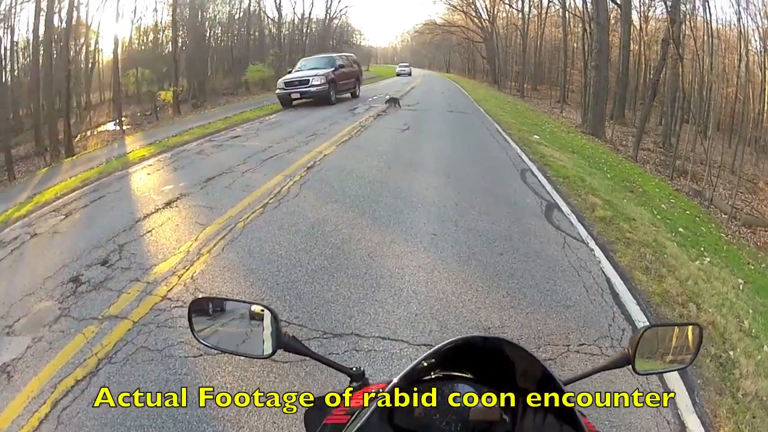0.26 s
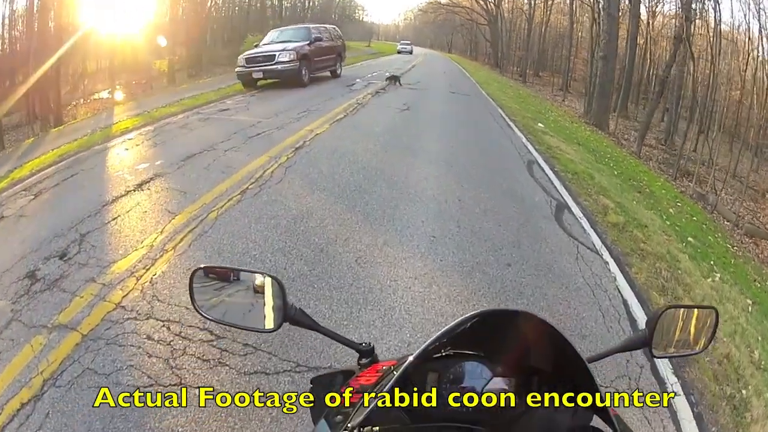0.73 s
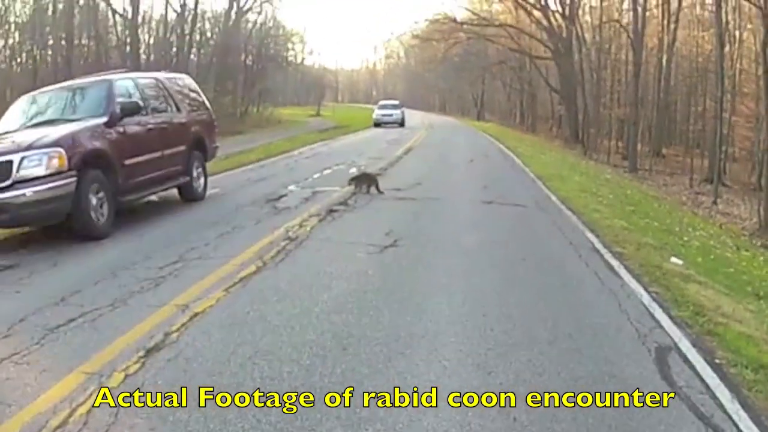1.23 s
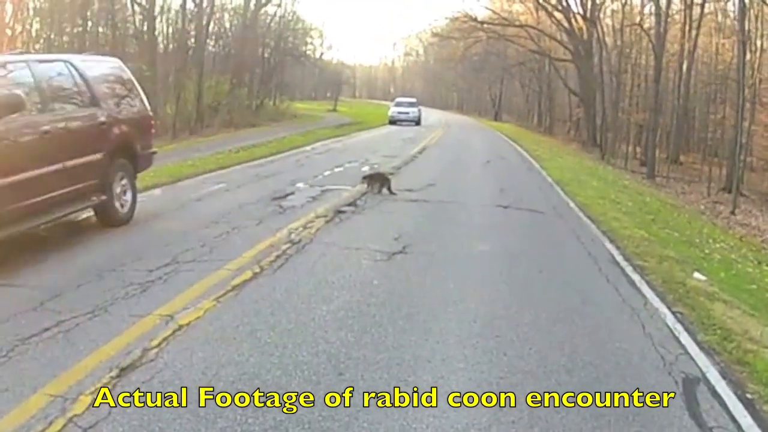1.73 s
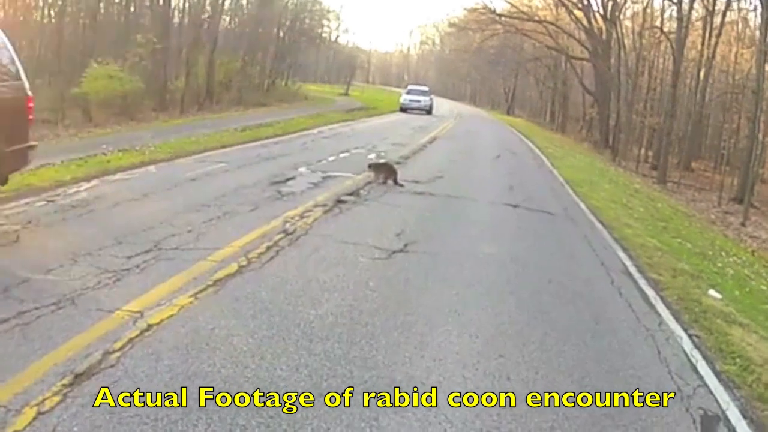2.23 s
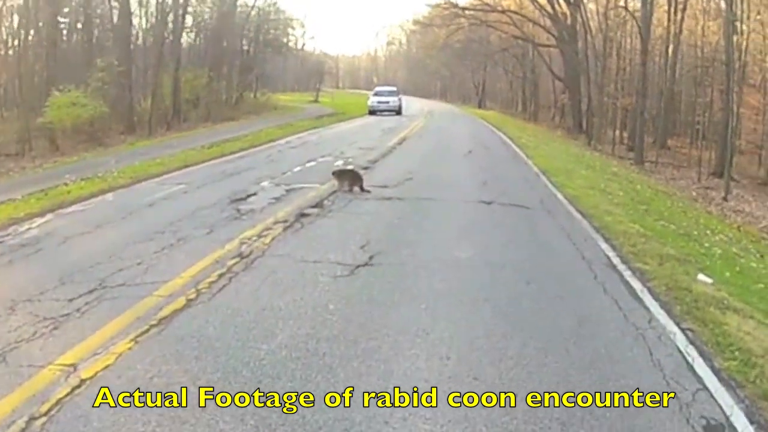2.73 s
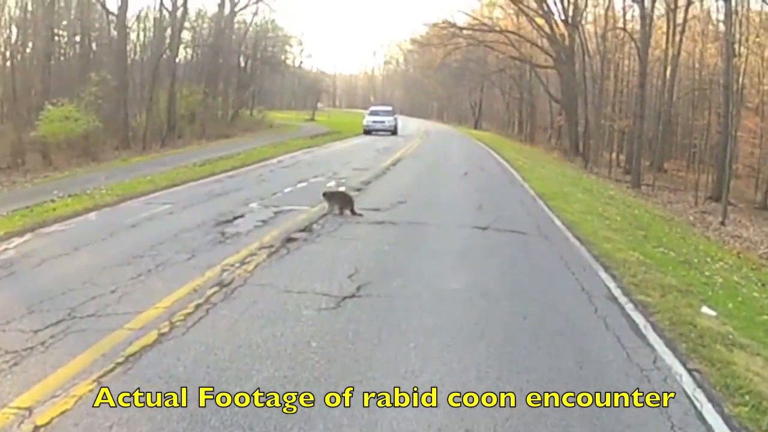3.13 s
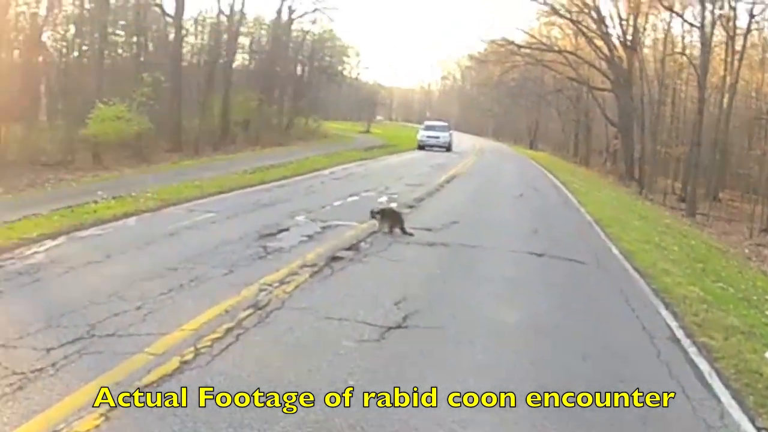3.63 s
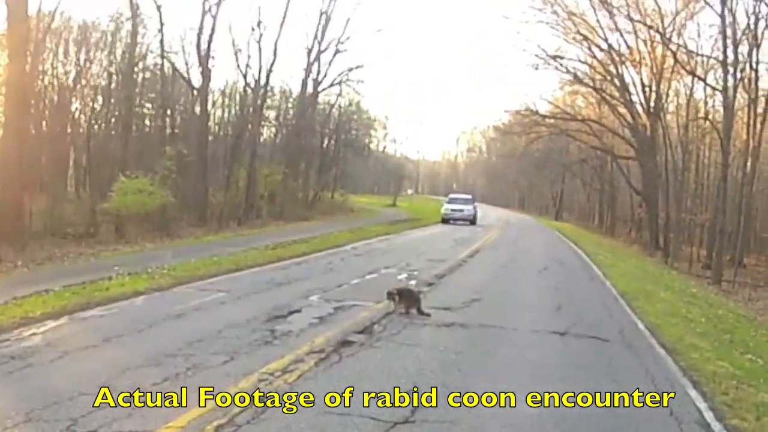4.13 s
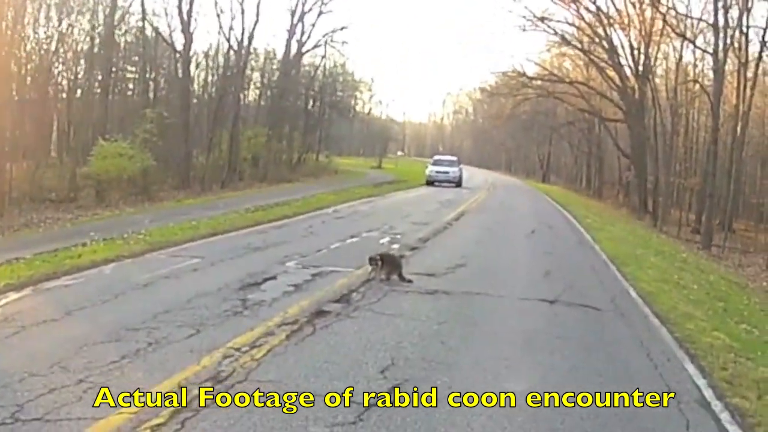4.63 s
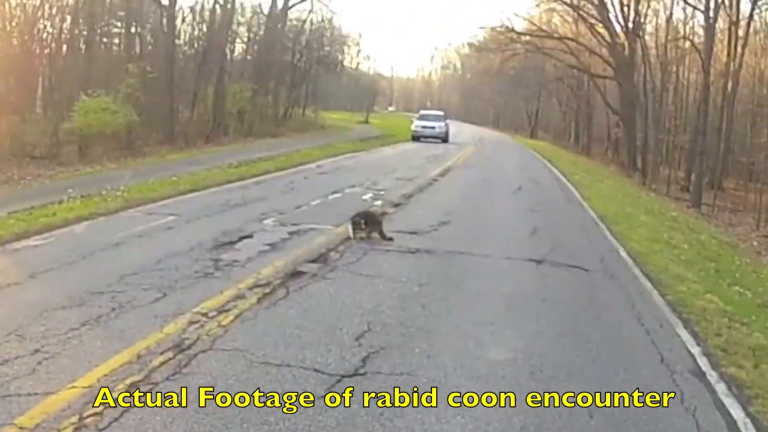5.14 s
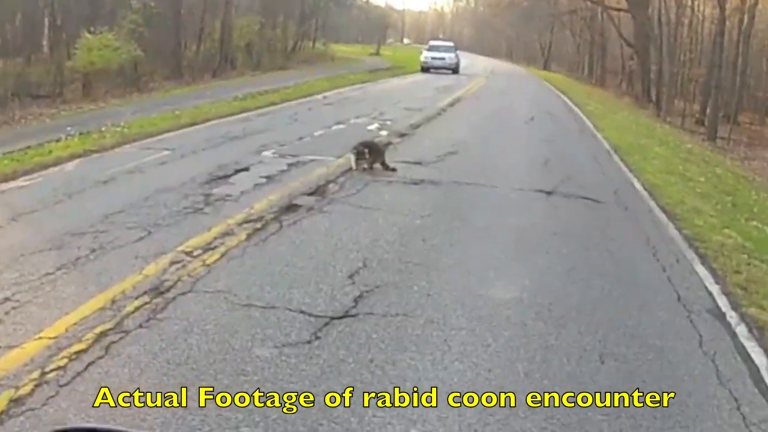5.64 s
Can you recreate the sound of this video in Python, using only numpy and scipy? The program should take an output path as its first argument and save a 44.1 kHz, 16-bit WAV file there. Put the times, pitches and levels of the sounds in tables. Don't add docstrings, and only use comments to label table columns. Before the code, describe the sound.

Gritty, overloaded motorcycle exhaust: two throttle bursts, a stumbling fall in revs, quieter lumpy idling, and a final abrupt rev.

```python
import sys
import numpy as np
from scipy import signal
from scipy.fft import rfft, irfft
from scipy.io import wavfile
from scipy.ndimage import uniform_filter1d

SR = 44100
rng = np.random.default_rng(int(sys.argv[2]) if len(sys.argv) > 2 else 0)


def field_ratio(decibels):
    return 10 ** (np.asarray(decibels, dtype=float) / 20)


def wav_record(signal):
    frames = np.transpose(np.atleast_2d(signal))
    bounded = np.clip(frames, -1, 1)
    quanta = np.round(bounded * 32767).astype(np.int16)
    wavfile.write(sys.argv[1], SR, quanta)


N = 258999
TIME = np.arange(N) / SR
CHANGE_S = 5.0193
IDLE_PER_S = 46.766


def evened(x):
    return x / np.sqrt(np.mean(x ** 2) + 1e-20)


def curve(rows, column=1):
    rows = np.asarray(rows, float)
    return np.interp(TIME, rows[:, 0], rows[:, column])


def coloured(x, points):
    points_hz, points_db = np.transpose(points)
    hz = np.fft.rfftfreq(N, 1 / SR)
    gain_db = np.interp(np.log(hz + 1), np.log(points_hz), points_db)
    return evened(irfft(rfft(x) * field_ratio(gain_db), N))


# start in seconds, name of the way of running.
RIDE = [(0, "pull"), (0.1, "ease"), (.17, "coast"), (0.229, "pull"), (0.35, "overrun"), (.58, "starve"),
        (.735, "pop"), (.865, "coast"), (.95, "stumble"), (1.16, "stall"), (1.294, "idle"), (5.38, "pull"),
        (5.458, "top"), (5.584, "cruise"), (5.8, "settle")]


def running(table, column, glide_s=.03):
    now = np.searchsorted([start_s for start_s, _ in RIDE], TIME, "right") - 1
    values = np.array([table[way][column] for _, way in RIDE], float)
    return uniform_filter1d(values[now.clip(0)], size=round(glide_s * SR), mode="nearest")


def revs(rate):
    return np.clip((rate - 60) / 70, 0, 1)


# time in seconds, firings per second.
BLIPS = [
    [(0, 45.79), (.05, 69.35), (.1, 110.37), (.132, 117.98), (.2, 103.18), (.236, 75.64)],
    [(.31, 149.35), (.35, 200.85), (.39, 209.74), (.46, 190.34), (.62, 152.8), (.88, 97.25), (1.0, 81.51),
     (1.2, 55.95), (1.28, 48.0)],
    [(4.95, 49.2), (5.3, 44.6), (5.372, 46.46), (5.4, 65), (5.44, 86.45), (5.57, 164.3), (5.64, 183.5),
     (5.7, 171.7), (5.873, 156.6)],
]
# swings per second, size in firings per second, rising at seconds.
HUNTING = [(.892, .391, 2.416), (2.193, .544, 2.999), (2.78, .338, 3.181)]
# middle in seconds, extra firings per second, half width in seconds.
SURGES = [(2.802, 5.774, .192), (4.701, 6.855, .392)]


def speed_before():
    idle = IDLE_PER_S - .629 * (TIME - 3)
    for swings_per_s, size, rising_s in HUNTING:
        idle += size * np.sin(2 * np.pi * swings_per_s * (TIME - rising_s))
    for middle_s, size, width_s in SURGES:
        idle += size * np.exp(-((TIME - middle_s) / width_s) ** 2)
    blips_end_s = BLIPS[1][-1][0]
    return np.where(TIME < blips_end_s, curve(BLIPS[0] + BLIPS[1]), idle)


def speed_after():
    return curve(BLIPS[2]) * (TIME >= BLIPS[2][0][0])


LEVELS = {"pull": (2.5, -45, -19.5, -43.5), "ease": (-5.5, -30, -18.5, -49),
          "overrun": (-8.5, -3.5, -20.5, -39.5), "starve": (-13, -2.5, -19.5, -35),
          "pop": (0, -4.5, -17.5, -36.5), "coast": (-41, -4.5, -19, -37), "stumble": (-23, -1, -20, -38),
          "stall": (-25, -16, -20, -40), "idle": (2.5, -10, -22.5, -40.5), "top": (1, -39, -21, -44.5),
          "cruise": (-1.5, -56, -28.5, -42), "settle": (-3, -48, -27.5, -51)}
# frequency in Hz, level in dB per Hz.
CASING = [(430, -30), (540, -1.5), (625, 15.5), (720, -3), (1200, -8), (1560, -4), (2060, -3), (2600, -4),
          (2860, -3), (3320, -9.5), (3820, -8.5), (4580, -10.5), (5690, -22), (6200, -41)]
# frequency in Hz, level in dB per Hz.
CASING_REVVED = [(430, -24), (620, 13.5), (800, -0.5), (1150, -13), (1420, -4.5), (1670, -7.5), (2280, -2),
                 (2690, -2.5), (2920, 1.5), (3300, -7.5), (4260, -10), (4580, -9), (5460, -20.5),
                 (6200, -24)]


def valve_rattle(rate):
    unevenness = evened(uniform_filter1d(rng.standard_normal(N), 150))
    ticks = rng.standard_normal(N) * field_ratio(1.36 * unevenness)
    fast = regular_share = revs(rate)
    idle_ring = np.sqrt(1 - regular_share) * coloured(ticks, CASING)
    revved_ring = np.sqrt(fast) * coloured(ticks[::-1], CASING_REVVED)
    level_db = running(LEVELS, column=3, glide_s=.15)
    level_db = level_db + 2 * np.log2(rate / IDLE_PER_S)
    return field_ratio(level_db + 4.5) * (idle_ring + revved_ring)


def gear_whine(rate, turns):
    return field_ratio(-52.5) * revs(rate) ** 2 * np.sin(2 * np.pi * turns * 7)


# frequency in Hz, width in Hz, then levels in dB for
PIPE = [(56, 17.4, -20.5, -39.5, -41.5, -19), (98, 140, -42, -3, 22.5, -13),
        (136.9, 56.6, -5.5, -22, -11, -18), (185.9, 40.7, 0.5, -3.5, -12, -21.5),
        (298.8, 66.6, 2, 0, 1.5, 2), (386, 39, -22, -2.5, -15.5, -13), (530.7, 44, -26, -3, -38.5, -19),
        (598, 62, -36.5, -39, -13.5, 0.5), (860, 280, -36, -44, -34, -31.5)]
LEAD = 220


def pipe(column, puff_ms, dip, dip_ms):
    t = np.arange(6000) / SR
    ring = np.zeros(len(t))
    for row in PIPE:
        hz, width_hz = row[:2]
        ring += field_ratio(row[column]) * np.exp(-np.pi * width_hz * t) * np.cos(2 * np.pi * hz * t)
    ms = 1000 * t[:500] - 5
    puff = np.exp(-(ms / puff_ms) ** 2) - dip * np.exp(-((ms + dip_ms) / puff_ms) ** 2)
    answer = np.convolve(ring, puff)
    answer = np.roll(answer, LEAD - np.argmax(answer))
    return answer / answer.max()


def gas_roar(turns):
    gust = 1.8 + np.exp(-(turns % 1))
    hiss = gust * rng.standard_normal(N)
    roar = signal.oaconvolve(hiss, pipe(column=5, puff_ms=0.58, dip=0.19, dip_ms=1.33))
    return field_ratio(running(LEVELS, column=2)) * evened(roar[:N])


# level in dB, lateness as a share of a firing.
CYLINDERS = [(0, 0), (-.8, .018), (.2, .003), (-.6, .015)]
ROUGHNESS = {"pull": (.12, .8), "ease": (.18, 1), "overrun": (.12, 1.7), "starve": (.11, 1.8),
             "pop": (.13, 1.3), "coast": (.22, 1), "stumble": (.4, 1), "stall": (.3, 1), "idle": (.09, .9),
             "top": (.07, .5), "cruise": (.06, .45), "settle": (.05, .4)}
# time in seconds, puff level in dB against overload.
CATCHES = [(.233, 1.5), (.263, 3), (0.88, 2.5), (.900, 0.5), (0.909, -8), (1.054, 5), (1.067, 5),
           (1.141, 4), (1.157, -2.5), (1.174, 3), (1.19, -1.5), (1.227, 1), (1.268, -5), (1.286, 2.5),
           (5.405, -4), (5.431, -5.5)]
# time in seconds, level in dB against overload.
GULPS = [(0.025, 4), (0.263, 9.5), (.280, 0), (0.955, 2), (1.004, -16), (1.029, -13), (1.111, -9),
         (1.127, -9)]


def exhaust_pulses(rate, turns):
    count = np.arange(1, int(turns[-1]) + 1)
    chance = rng.standard_normal((len(count), 3))
    due = np.searchsorted(turns, count)
    uneven = running(ROUGHNESS, column=0)[due]
    imbalance = running(ROUGHNESS, column=1)[due]
    step_db, late = np.transpose(CYLINDERS)[:, count % 4] * imbalance
    fast = revs(rate)

    at = np.searchsorted(turns, count + late + .045 * uneven * chance[:, 0]).clip(0, N - 1)
    after = np.searchsorted(turns, count + late + 0.41 * fast[at]).clip(0, N - 1)
    burnt, suck = np.zeros((2, N))
    burnt[at] = field_ratio(running(LEVELS, column=0)[at] + step_db + 6 * uneven * chance[:, 1])
    suck[after] = field_ratio(running(LEVELS, column=1)[at] + 2.5 * step_db + 6 * uneven * chance[:, 2])
    lazy, hard = burnt * (1 - fast), burnt * fast
    for s, db in CATCHES:
        lazy[round(s * SR)] += field_ratio(db)
    for s, db in GULPS:
        suck[round(s * SR)] += field_ratio(db)

    puffs = field_ratio(1.0) * signal.oaconvolve(lazy, pipe(column=2, puff_ms=1.0, dip=0.23, dip_ms=2.285))
    puffs += signal.oaconvolve(hard, pipe(column=3, puff_ms=0.66, dip=0.33, dip_ms=1.794))
    sucks = signal.oaconvolve(suck, pipe(column=4, puff_ms=0.68, dip=0.67, dip_ms=2.72))
    drain = signal.butter(2, 90, "high", fs=SR, output="sos")
    sucks = signal.sosfilt(drain, sucks)
    return (puffs - sucks)[LEAD:N + LEAD]


def exhaust(rate, first_turn):
    turns = np.cumsum(rate) / SR + first_turn
    return exhaust_pulses(rate, turns) + gas_roar(turns) + gear_whine(rate, turns)


def scene():
    before, after = speed_before(), speed_after()
    first_view = TIME < CHANGE_S
    engine = np.where(first_view, exhaust(before, first_turn=.84), exhaust(after, first_turn=.38))
    rate = np.where(first_view, before, after)
    rumble = signal.sosfiltfilt(signal.butter(4, 82, fs=SR, output="sos"), engine)
    return (engine - 0.79 * revs(rate) * rumble + valve_rattle(rate))[None]


def treble_dropouts(x):
    hz, t, z = signal.stft(x, SR, nperseg=1024)
    runs = evened(uniform_filter1d(rng.standard_normal((2, len(t))), size=5, axis=1))
    runs = runs + .6 * runs[::-1]
    for (low_hz, high_hz), run in zip([(13000, 13700), (13700, 14400)], runs):
        z[:, (hz > low_hz) & (hz <= high_hz)] *= np.where(run > .6, 1, .02)
    return signal.istft(z, SR, nperseg=1024)[1][:, :N]


def band_limit(x):
    return signal.sosfilt(signal.butter(12, 16590, fs=SR, output="sos"), x)


# time in seconds, level in dB.
VOLUME = [(0, -9.8), (.26, -4), (.33, -2.5), (.6, -1), (.9153, -.3), (.91535, -14), (5.372, -14),
          (5.39, -6.4), (5.403, -2.7), (5.535, -3.8), (5.873, -5.5)]


def record(dry):
    clipped = np.clip(dry, -1, 1)
    slow = signal.resample_poly(clipped, 40, 147, axis=1, window=("kaiser", 8))
    held = signal.resample_poly(np.repeat(slow, 4, axis=1), 147, 160, axis=1)[:, :N]
    held = np.pad(held, ((0, 0), (0, N - held.shape[1])))
    from_change_s = TIME - CHANGE_S
    click = .25 * np.sign(from_change_s) * np.exp(-abs(from_change_s) / .002)
    fade_out = np.clip((N / SR - TIME) / .003, 0, 1)
    edited = (held + click) * field_ratio(curve(VOLUME)) * fade_out - .002
    lowpass = signal.firwin(401, 15300, window=("kaiser", 9), fs=SR)
    edited = signal.oaconvolve(edited, lowpass[None], "same")
    finished = treble_dropouts(edited)
    return band_limit(finished)


dry = scene()
out = record(dry)
wav_record(out)
```